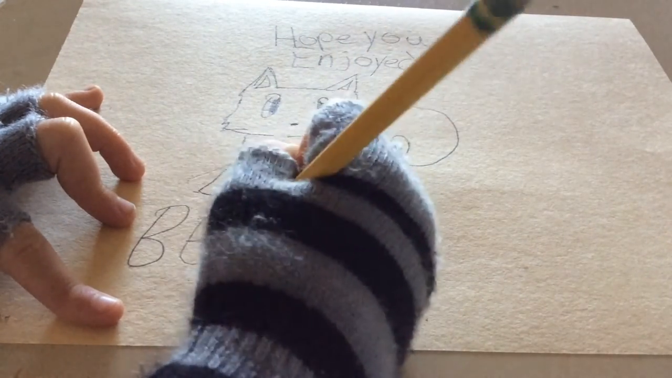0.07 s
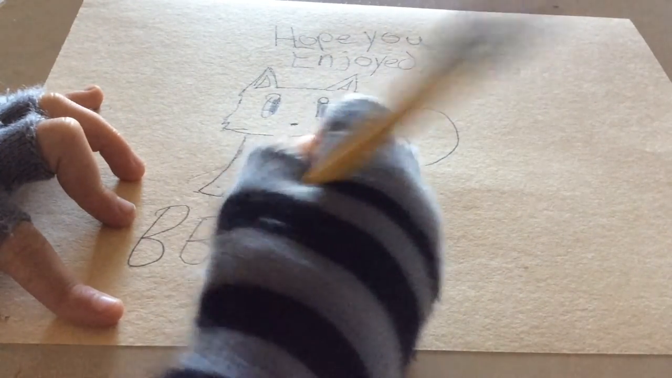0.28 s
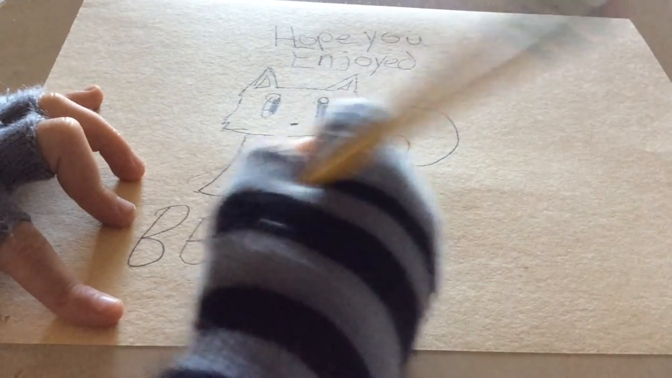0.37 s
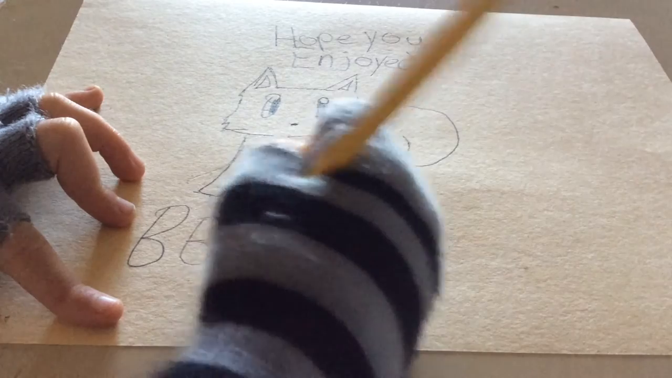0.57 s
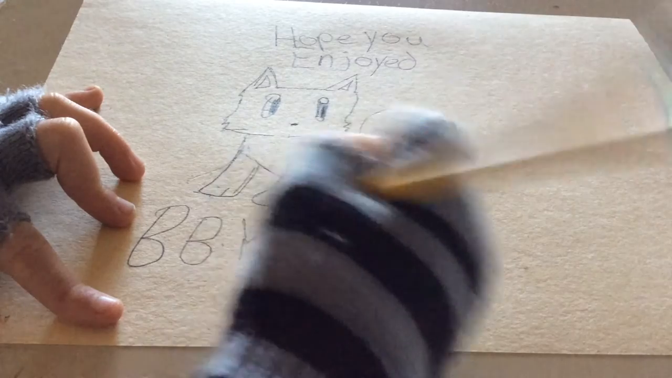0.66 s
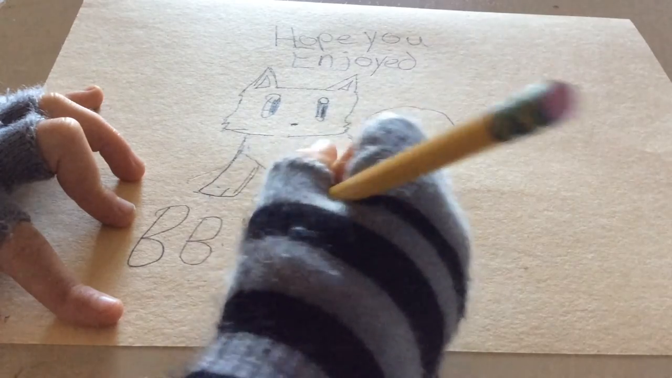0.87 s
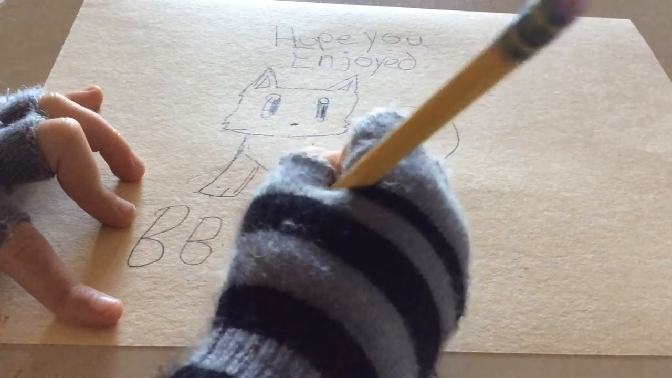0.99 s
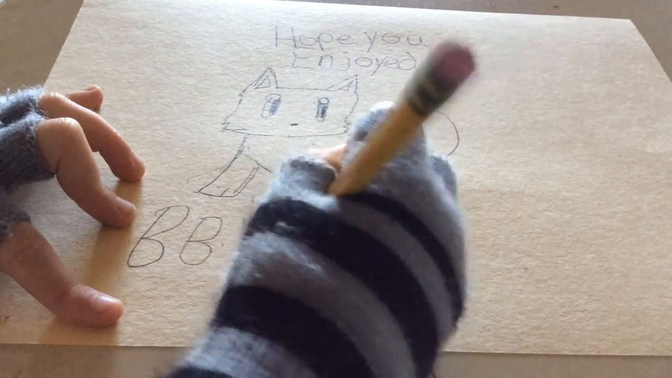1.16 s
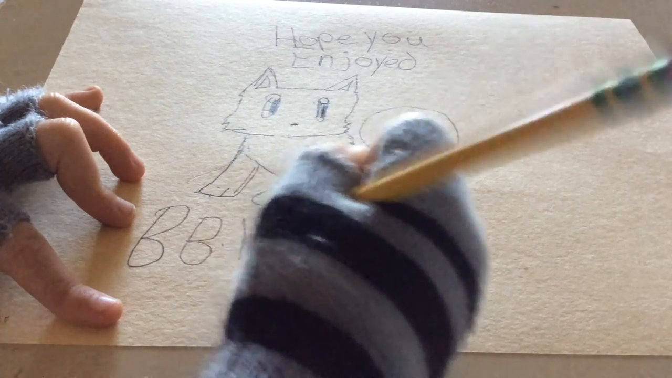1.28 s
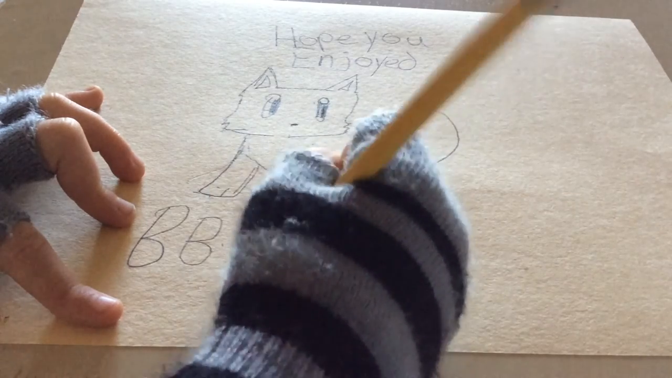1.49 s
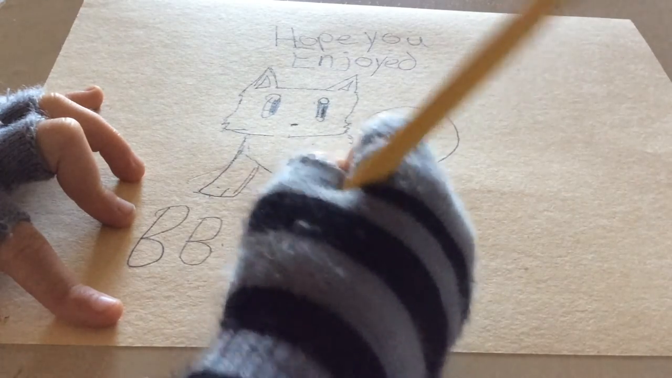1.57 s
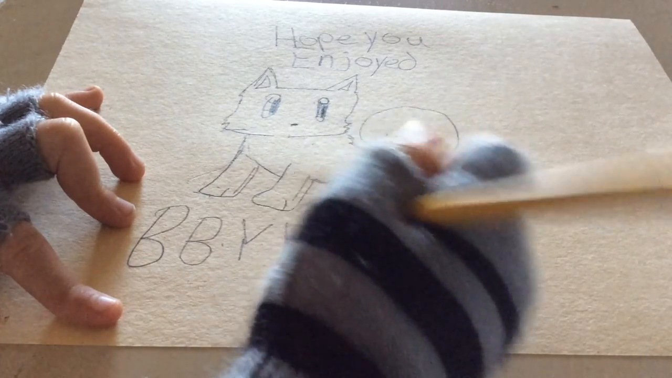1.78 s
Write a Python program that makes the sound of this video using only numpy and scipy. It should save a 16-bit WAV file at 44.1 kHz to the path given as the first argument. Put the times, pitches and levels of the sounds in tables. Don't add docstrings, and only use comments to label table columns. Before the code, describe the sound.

Close phone pickup of pencil writing indoors: quick irregular strokes and lead knocks thudding through a wooden table, a pause, more strokes, then soft knitted-glove swishes over faint room air.

```python
import sys
import numpy as np
from scipy import signal
from scipy.fft import rfft, irfft, next_fast_len
from scipy.io import wavfile
from scipy.ndimage import uniform_filter1d, map_coordinates

SR = 44100
rng = np.random.default_rng(int(sys.argv[2]) if len(sys.argv) > 2 else 0)


def ratio(d):
    e = np.asarray(d, float) / 20
    return 10 ** e


def digitize_waveform(pressure):
    field = np.atleast_2d(pressure).T
    bounded = np.clip(field, -1, 1)
    quanta = np.round(bounded * 32767).astype(np.int16)
    wavfile.write(sys.argv[1], SR, quanta)


N = 81585

# start in seconds, length in seconds, fibre hiss in dB, table shake in dB,
# place of top speed from 0 to 1.
STROKES = [(-.03, 0.17, -62, -51.5, 0.5), (0.194, 0.078, -54, -42.5, 0.41), (0.264, 0.066, -74, -65.5, 0.8),
           (0.431, .033, -61.5, -51, 0.76), (0.504, 0.084, -57, -44.5, 0.29), (0.598, 0.055, -85, -62, .4),
           (0.956, 0.096, -61, -48.5, 0.56), (1.04, 0.041, -73, -58.5, 0.1),
           (1.1, .105, -56.5, -48.5, 0.51), (1.227, 0.029, -72.5, -60.5, 0.47),
           (1.403, 0.032, -65.5, -51.5, 0.4), (1.48, 0.086, -57.5, -39.5, 0.56),
           (1.578, 0.047, -96, -59.5, 0.25), (1.625, 0.017, -67.5, -60, 0.65)]
# time in seconds, peak level in dB, contact time in seconds.
TAPS = [(0.038, -38.5, 0.0013), (0.108, -41, 0.00086), (0.222, -28.5, 0.0014), (0.427, -43, 0.0013),
        (0.432, -17.5, 0.0012), (0.524, -33.5, 0.0014), (0.545, -33, 0.0017), (0.871, -55, 0.00092),
        (0.902, -25.5, 0.0015), (1.019, -41, 0.0012), (1.1, -46, 0.0017), (1.134, -33, 0.0011),
        (1.406, -30, 0.0019), (1.495, -31.5, 0.0013), (1.527, -25.5, 0.0015)]
# frequency in Hz, level in dB, 60 dB decay time in seconds.
TABLE_MODES = [(61, 2, 0.05), (126.9, 6.5, 0.09), (308.5, 4, 0.062), (403.7, 2, 0.048), (488, -9.5, 0.04),
               (564, -9, 0.054), (698, -19, 0.072), (880, -26.5, 0.058), (1155, -22, 0.032),
               (1390, -34, 0.046), (1600, -20, 0.044)]
# frequency in Hz, level in dB.
SCRATCH_SPECTRUM = [(500, 6), (1400, 6), (2500, -0.5), (5000, -5.5), (8000, -2), (12000, -2), (15000, -13)]
# frequency in Hz, width in Hz, lift in dB.
SHAFT_PEAKS = [(1420, 90, 5), (2400, 120, 3), (3480, 190, 8), (5250, 260, 6), (8650, 350, 5),
               (9500, 300, 3), (11400, 350, 5), (12300, 200, 3)]
# start in seconds, length in seconds, level in dB, place of top speed from 0 to 1.
SLIDES = [
    (0.67, 0.12, -64.5, 0.63),
    (0.838, .085, -69.5, 0.9),
    (1.057, 0.063, -74.5, 0.4),
    (1.279, 0.06, -73.5, 0.6),
    (1.686, .125, -67.5, 0.59),
    (1.832, .06, -71, .5),
]
# frequency in Hz, level in dB.
WOOL_SPECTRUM = [(150, 0.5), (600, -8.5), (2000, -4), (5000, -1), (7000, -6.5), (10000, -12), (15000, -26)]
# start in seconds, length in seconds,
# frequency in Hz, width in Hz, level in dB.
CREAK = (-2, .2, 1330, 90, -75)
# frequency in Hz, level in dB.
ROOM_SPECTRUM = [(25, 5.5), (60, 11), (150, 11), (400, 2), (1500, -5.5), (5000, -11.5), (10000, -14.5),
                 (15000, -27.5)]
# frequency in Hz, width
# in Hz, lift or dip in dB.
PORT_PEAKS = [(4320, 200, -0.5), (5180, 460, 1.5), (7050, 644, -6), (8730, 820, 4), (10350, 190, -1),
              (11400, 610, 3), (15000, 700, 3),
              (13350, 260, -9)]

STROKE_EDGE_S, STROKE_DOME_DB = 0.0065, 8
SHAKE_GROWS = 1.85
FIBRES_PER_S, FIBRE_SPREAD_DB = 12000, 3
BUMP_DB, DRAG_CONTACT_S = 4, 0.0011
TAP_DB, TAP_LAG_S = -5, 0.002172
SLIDE_EDGE_S, SLIDE_DOME_DB = 0.019, 7.5
NEAR_DB, NEAR_T60_S = -3, 0.041
ECHO_DB, ECHO_T60_S = -18, 0.41
ROOM_DB, ROOM_SWAY_DB = -70, -1
TOP_HZ = 15450


def pencil():
    scratch = fibre_hiss()
    return scratch + scatter(scratch, NEAR_DB, NEAR_T60_S) + table(lead_force())


def fibre_hiss():
    size = rng.standard_normal(N) * ratio(FIBRE_SPREAD_DB * rng.exponential(size=N))
    crossed = rng.random(N) < FIBRES_PER_S / SR
    clicks = filtered(size * crossed, lifts(SHAFT_PEAKS))
    fibres = patchy(coloured(clicks, SCRATCH_SPECTRUM), 2) * ratio(0.85 * wobble(70.1))
    hiss = sum(ratio(db) * swell(start, length, top, STROKE_EDGE_S, STROKE_DOME_DB)
               for start, length, db, _, top in STROKES)
    return hiss * fibres


def lead_force():
    dome_db = STROKE_DOME_DB * SHAKE_GROWS
    drag = sum(ratio(db) * swell(start, length, top, STROKE_EDGE_S, dome_db)
               for start, length, _, db, top in STROKES)
    lumps = rng.standard_normal(N) * ratio(BUMP_DB * wobble(120))
    bumps = np.convolve(lumps, push(DRAG_CONTACT_S))[:N]
    force = drag * bumps / np.std(table(bumps))
    for time, db, contact in TAPS:
        first = round((time + TAP_LAG_S) * SR)
        force[first:][:400] += ratio(db + TAP_DB) * push(contact)
    return force


def push(contact):
    u = np.arange(400) / SR / contact
    shape = np.sin(np.pi * np.clip(u, 0, 1)) ** 2
    return shape / shape.sum()


def table(force):
    t = np.arange(SR // 4) / SR
    ring = sum(ratio(db - 60 * t / t60) * np.sin(2 * np.pi * hz * t) for hz, db, t60 in TABLE_MODES)
    velocity = -np.diff(ring, prepend=0) * 10
    return signal.fftconvolve(force, velocity)[:N]


def glove():
    gain = sum(ratio(db) * swell(start, length, top, SLIDE_EDGE_S, SLIDE_DOME_DB)
               for start, length, db, top in SLIDES)
    return gain * ratio(1.2 * wobble(39.93)) * coloured(rng.standard_normal(N), WOOL_SPECTRUM)


def creak():
    start, length, hz, width_hz, db = CREAK
    tone = filtered(rng.standard_normal(N), lambda f: 1 / (1 + ((f - hz) / width_hz) ** 4))
    return ratio(db) * swell(start, length, 0.45, 0.035, 2.2) * unit(tone)


def room():
    air = patchy(coloured(rng.standard_normal(N), ROOM_SPECTRUM), 2.2)
    return ratio(ROOM_DB + ROOM_SWAY_DB * wobble(11.7)) * air


def scatter(x, level_db, t60):
    t = np.arange(SR // 3) / SR
    tail = rng.standard_normal(len(t)) * ratio(-60 * t / t60) * (t > 0.001)
    return ratio(level_db) * signal.fftconvolve(x, tail / np.linalg.norm(tail))[:N]


def swell(start, length, top, edge, dome_db):
    t = np.arange(N) / SR - start
    top = np.clip(top, 0.05, 0.95)
    u = t / length
    off = np.where(u < top, (top - u) / top, (u - top) / (1 - top))
    gate = np.clip(np.minimum(t, length - t) / edge, 0, 1)
    return gate ** 2 * ratio(-dome_db * np.clip(off, 0, 1) ** 1.41)


def wobble(rate):
    knots = rng.standard_normal(int(N * rate / SR) + 4)
    return map_coordinates(knots, [np.arange(N) * rate / SR])


def patchy(x, depth_db):
    z = signal.stft(x, nperseg=256)[2]
    field = rng.standard_normal(z.shape)
    field = uniform_filter1d(uniform_filter1d(field, 5, 0), 9, 1)
    return unit(signal.istft(z * ratio(depth_db * unit(field)), nperseg=256)[1][:N])


def lifts(peaks):
    return lambda f: ratio(sum(db * np.exp(-0.5 * ((f - hz) / w) ** 2) for hz, w, db in peaks))


def coloured(x, spectrum):
    points_hz, points_db = np.transpose(spectrum)

    def response(hz):
        return ratio(np.interp(np.log(hz + 1), np.log(points_hz + 1), points_db))
    return unit(filtered(x, response))


def filtered(x, response):
    m = next_fast_len(N + SR // 2)
    return irfft(rfft(x, m) * response(np.fft.rfftfreq(m, 1 / SR)), m)[..., :N]


def unit(x):
    return x / np.sqrt(np.mean(x ** 2) + 1e-20)


def scene():
    near = pencil() + glove()
    return (near + scatter(near, ECHO_DB, ECHO_T60_S) + creak() + room())[None]


def roll_off(x):
    return signal.sosfilt(signal.butter(12, 15510, fs=SR, output="sos"), x)


def record(dry):
    port = lifts(PORT_PEAKS)
    mix = filtered(dry, lambda f: port(f) * (f < TOP_HZ))
    return roll_off(mix)


dry = scene()
out = record(dry)
digitize_waveform(out)
```